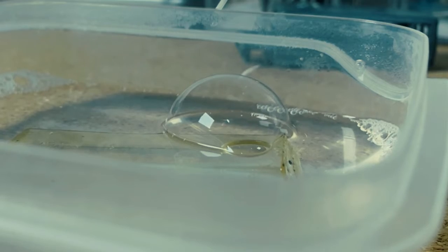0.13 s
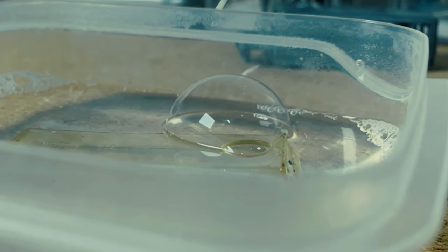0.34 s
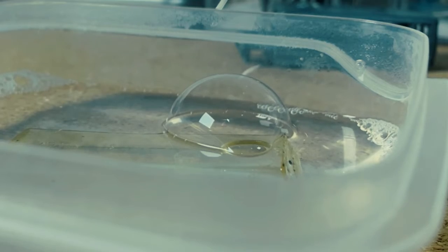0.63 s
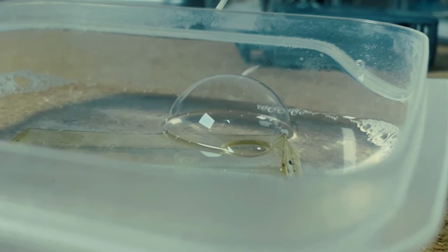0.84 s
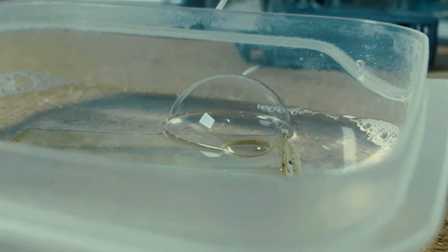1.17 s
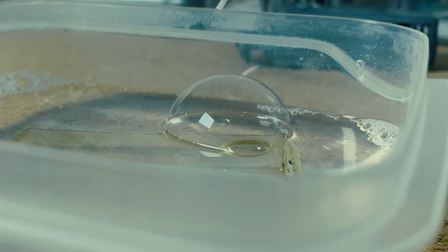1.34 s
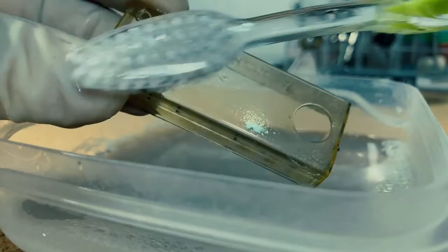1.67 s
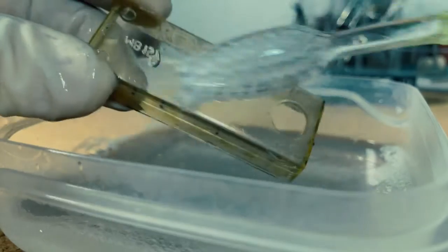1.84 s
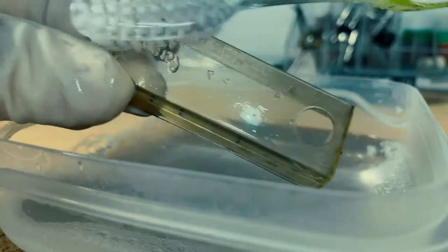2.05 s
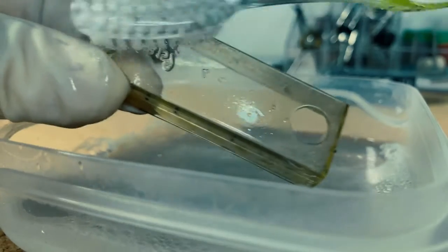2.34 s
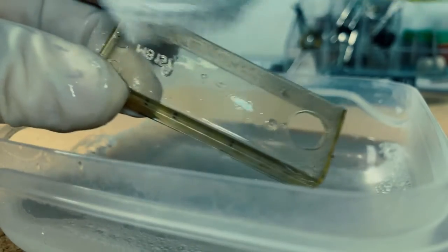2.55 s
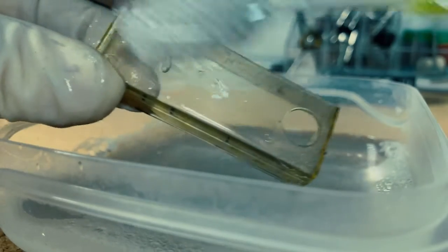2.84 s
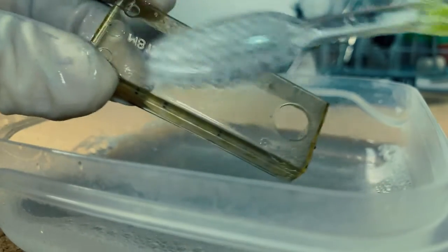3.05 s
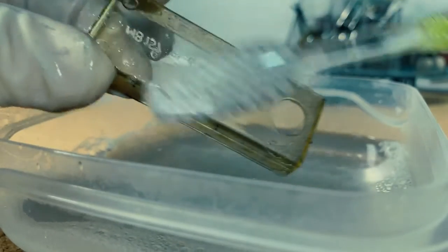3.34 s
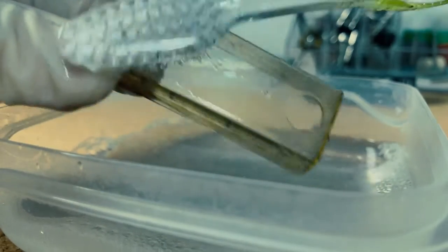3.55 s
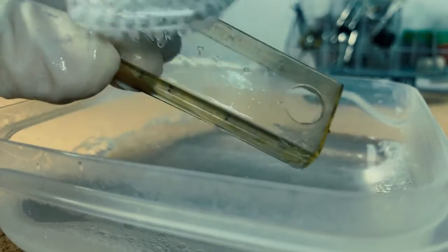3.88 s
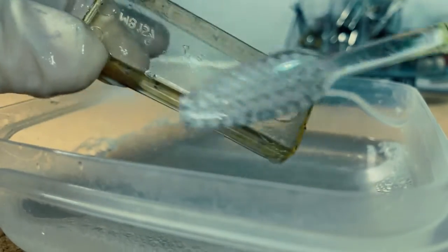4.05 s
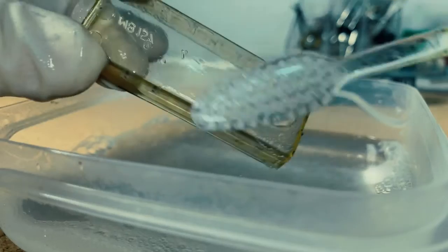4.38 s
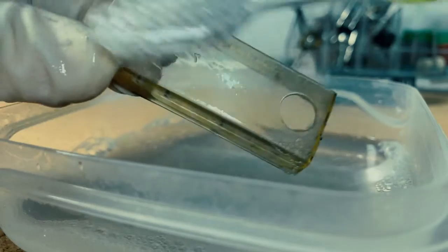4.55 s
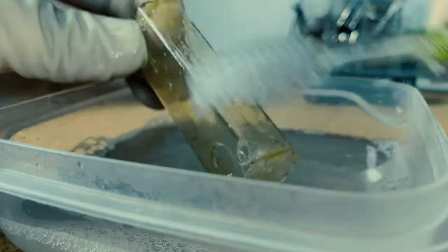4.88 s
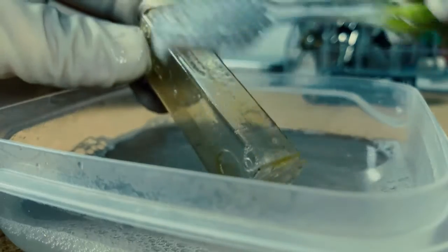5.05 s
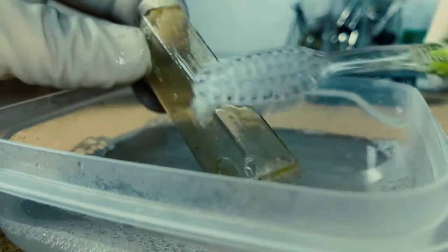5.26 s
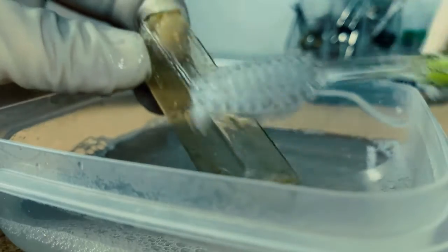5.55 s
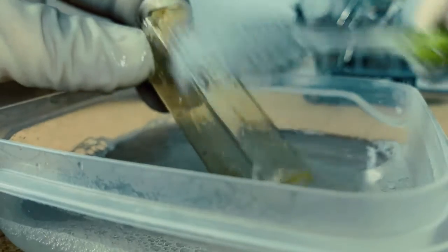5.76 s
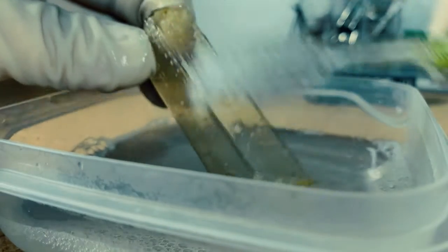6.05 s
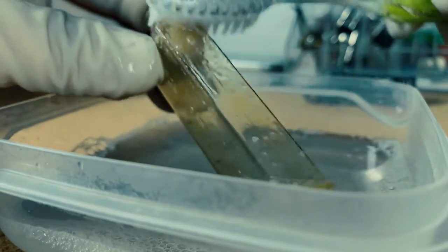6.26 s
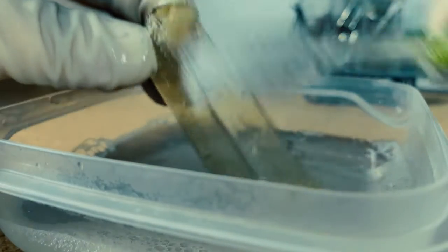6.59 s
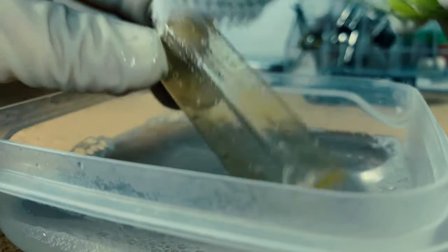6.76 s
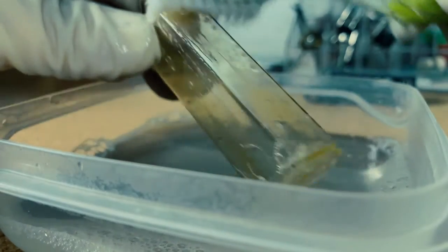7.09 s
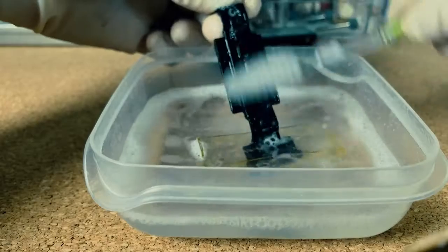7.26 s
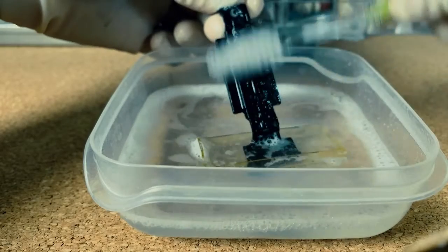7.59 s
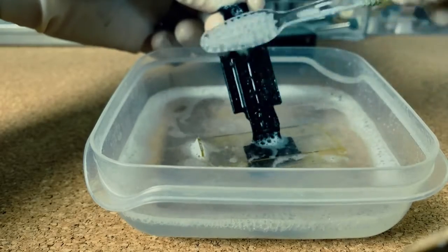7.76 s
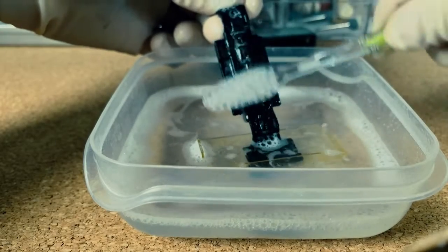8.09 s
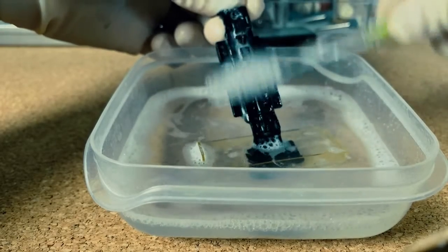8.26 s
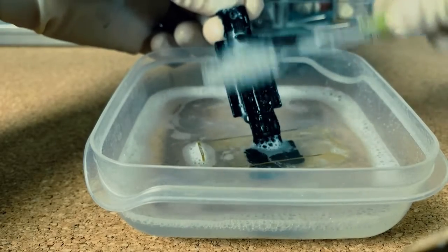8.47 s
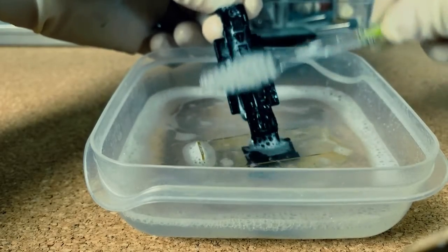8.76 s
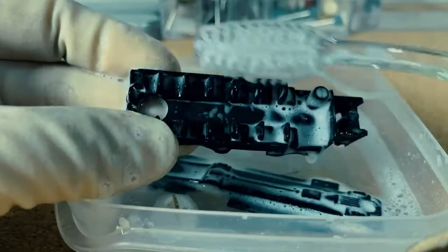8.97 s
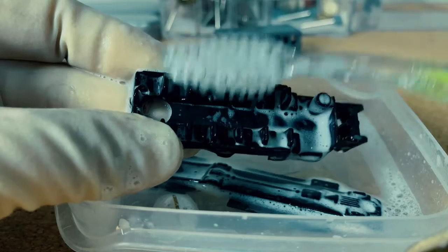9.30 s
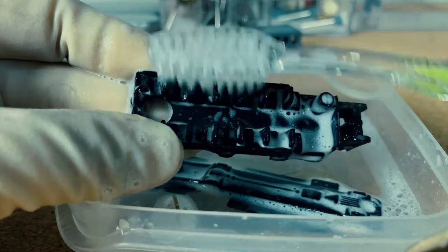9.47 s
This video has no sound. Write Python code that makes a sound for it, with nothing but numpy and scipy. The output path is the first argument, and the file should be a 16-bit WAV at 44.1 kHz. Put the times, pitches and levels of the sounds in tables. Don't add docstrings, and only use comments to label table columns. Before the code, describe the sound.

A quiet room with deep soft rumble gives way to dry, fizzy bristle scrubbing, very near the microphone. Alternating strokes swish over four small wet plastic parts in turn, each with a different colour and ring. Sharp bristle snaps, dull brush-head knocks against part and tub, and thuddy table rumble accompany them. The scrubbing quickens, stops for a moment, then resumes until the end.

```python
import sys
import numpy as np
from scipy import signal
from scipy.fft import rfft, irfft, next_fast_len
from scipy.io import wavfile
from scipy.ndimage import uniform_filter1d

SR = 44100
rng = np.random.default_rng(int(sys.argv[2]) if len(sys.argv) > 2 else 0)


def generate_wav(signal):
    frames = np.transpose(np.atleast_2d(signal))
    scaled = np.clip(frames, -1, 1) * 32767
    pcm = np.round(scaled).astype(np.int16)
    wavfile.write(sys.argv[1], SR, pcm)


def undo_db(level):
    steps = np.asarray(level, float) / 20
    return 10 ** steps


N = 424683
SIZE = next_fast_len(N + 4096)
HZ, T = np.fft.rfftfreq(SIZE, 1 / SR), np.arange(N) / SR


def evened(x):
    return x / np.sqrt(np.mean(x ** 2) + 1e-20)


def read(points, hz=HZ):
    f, value = np.transpose(points)
    return np.interp(np.log(hz + 1), np.log(f + 1), value)


def over_time(points):
    return undo_db(np.interp(T, *np.transpose(points)))


def colour(x, gain):
    return irfft(rfft(x, SIZE) * gain, SIZE)[..., :N]


def band(lo_hz, hi_hz, steep=6):
    low_side = 1 + (lo_hz / (HZ + 1)) ** (2 * steep)
    high_side = 1 + (HZ / hi_hz) ** (2 * steep)
    return 1 / np.sqrt(low_side * high_side)


def humps(modes):
    return sum(undo_db(db) / (1 + ((HZ - hz) / width) ** 2) ** 0.98 for hz, width, db in modes)


def pair(gain, same):
    a, b = rng.standard_normal((2, N))
    return evened(colour(np.array([a, same * a + np.sqrt(1 - same ** 2) * b]), gain))


def flutter(ms):
    width = int(ms * 44)
    return evened(uniform_filter1d(uniform_filter1d(rng.standard_normal(N), width), width))


def frames(x):
    return signal.stft(x, SR, nperseg=512, noverlap=384)


def patches(shape, bins, steps):
    return evened(uniform_filter1d(uniform_filter1d(rng.standard_normal(shape), bins, 0), steps, 1))


CUTS = [
    1.668,
    8.912,
    9.142,
]


def is_brushing():
    start, stop, resume = CUTS
    return (T > start) & (T < stop) | (T > resume)


# start in seconds, deep level in dB, low level in dB.
TABLE = [
    (0, -68, -64.5),
    (1.671, -54.5, -50.5),
    (4.85, -58.5, -53.5),
    (7.2, -61, -53.5),
    (8.92, -59.5, -55),
]
# time in seconds, change of level in dB (negative for a dip),
# length in seconds.
RUMBLE_SWELLS = [(.55, 3, 0.14), (.9, 8, 0.14), (2.35, 6, 0.49), (2.73, 3, 0.1), (3.3, 10, 0.46),
                 (3.9, 10.5, 0.079), (4.65, 4.5, 0.81), (4.86, -26, 0.031), (5.46, 4.5, 0.063),
                 (5.63, -11.5, 0.058), (6.3, 8, 0.88), (8.87, 20.5, 0.015), (9.6, 3, 0.43)]


def table_db():
    start, deep_db, low_db = np.transpose(TABLE)
    now = np.searchsorted(start, T, "right") - 1
    swell_db = sum(db * np.exp(-((T - s) / length) ** 2) for s, db, length in RUMBLE_SWELLS)
    return deep_db[now] + swell_db, low_db[now] + 0.38 * swell_db


# frequency in Hz, width in Hz, level in dB.
DEEP = [(34.2, 5.6, -15), (51.7, 7.4, 11), (78, 33, -1.5)]
LOW = [(120.3, 27, -1), (149.6, 6.6, 0), (198, 53, -6)]
STILL_ROOM = [(118.5, 5.6, 4), (141.6, 5.4, -2), (167, 11, -6.5), (217, 36, -19)]


def rumble():
    deep_db, low_db = table_db()
    lumps = flutter(45)
    deep = pair(humps(DEEP), 0.94) * undo_db(deep_db + 0.84 * lumps)
    low = np.where(T < CUTS[0], pair(humps(STILL_ROOM), 0.98), pair(humps(LOW), 0.94))
    low = low * undo_db(low_db + 2.56 * lumps)
    return (deep + low) * undo_db([[.7], [-.7]])


# frequency in Hz, level in dB.
HUSH = [(250, -9), (517, -29.5), (800, -28.5), (1380, -34.5), (4000, -41.5), (7500, -42.5), (7900, -54),
        (8900, -53), (9300, -42.5), (9800, -42), (12400, -37.5), (12800, -60), (13900, -63), (14200, -36),
        (15500, -35.5)]
# time in seconds, hiss level in dB.
HUSH_LEVEL = [(0, -76), (1.655, -76.5), (1.67, -56), (8.9, -63), (8.91, -70), (9.14, -70), (9.63, -66)]
# frequency in Hz, width in Hz, level in dB.
MURMUR = [(290, 100, 0.5)]
# time in seconds, traffic level in dB.
MURMUR_LEVEL = [(0, -65), (.3, -80), (.55, -75.5), (1.0, -89), (1.6, -82)]


def room():
    hush = pair(undo_db(read(HUSH)) * band(306, 15500), 0.31) * over_time(HUSH_LEVEL)
    murmur = pair(humps(MURMUR), 0.88) * over_time(MURMUR_LEVEL)
    return rumble() + hush + murmur


# time in seconds, pitch in Hz, level in dB.
RUB = [
    (2.2, 330, -79),
    (2.321, 400, -50),
    (2.5, 474.6, -52.5),
    (2.75, 406, -55.5),
    (2.85, 376, -61),
]


def rub():
    s, hz, db = np.transpose(RUB)
    turns = np.cumsum(np.interp(T, s, hz)) / SR
    tone = np.sin(2 * np.pi * turns) + .5 * np.sin(2 * np.pi * 1.6 * turns)
    return tone * flutter(12) * undo_db(np.interp(T, s, db, -120, -120))


# time in seconds, peak in dB, pitch in Hz, time to fall 60 dB in seconds.
KNOCKS = [(1.455, -74, 4200, .03), (1.53, -74, 4300, .04), (1.603, -71, 1900, .04), (1.632, -65, 4400, .02),
          (2.028, -36, 678, 0.078), (2.981, -32.5, 474, 0.098), (3.238, -35, 370, 0.082),
          (3.42, -38.5, 258, 0.31), (2.71, -32, 123, 0.16), (3.234, -39, 62, 0.16), (3.895, -35, 62, .15),
          (4.37, -38, 447, 0.19), (4.394, -33, 152, 0.13), (5.016, -39, 369, 0.16),
          (6.134, -26.5, 394, 0.11), (6.35, -30, 825, 0.045), (6.81, -31.5, 350, 0.13),
          (7.682, -35, 348, 0.06), (7.786, -39.5, 352, 0.24), (8.431, -41.5, 403, 0.13),
          (8.846, -28, 484, 0.053), (8.854, -24, 754, 0.023)]


def knocks():
    out, t = np.zeros(N + 8000), np.arange(8000) / SR
    overtones = [(1, 0.98), (1.2, 0.51), (1.5, 0.404), (1.85, 0.16), (2.2, 0.28)]
    for s, db, hz, t60 in KNOCKS:
        ring = sum(g * np.sin(2 * np.pi * hz * ratio * t) for ratio, g in overtones)
        onset = np.minimum(t / 0.00083, 1)
        out[round(s * SR):][:8000] += undo_db(db - 5.0 - 60 * t / t60) * onset * ring
    return out[:N] * undo_db([[1.2], [-1.2]])


# time in seconds, peak in dB, level of the part's ring in dB.
SNAPS = [(1.6685, -31, -62), (1.675, -30, -57), (1.7877, -12.5, -29), (1.9972, -25, -39),
         (2.625, -13.5, -60), (2.854, -17, -37.5), (3.2606, -22, -60), (3.6364, -25, -54),
         (3.949, -26.5, -39), (4.0925, -26, -60), (4.117, -11, -33), (4.1178, -15.5, -40.5),
         (4.628, -27.5, -38), (4.684, -22, -52), (5.4934, -10.5, -46), (5.752, -19, -55),
         (5.953, -13.5, -49), (5.9764, -14, -59), (6.0054, -21, -61), (6.295, -20.5, -65),
         (6.334, -16.5, -55.5), (6.865, -26.5, -73.5), (6.9964, -43, -54), (7.68, -20, -61),
         (8.002, -30, -42), (8.0554, -16, -59), (8.3247, -30, -49), (9.1177, -50, -79), (9.146, -34.5, -58),
         (9.2378, -19, -48), (9.3462, -22, -50), (9.3946, -22, -46), (3.006, -21, -50), (5.0183, -22, -56),
         (5.614, -20, -46), (5.771, -19, -52), (5.8996, -26, -49), (6.051, -17, -48), (6.194, -21, -50),
         (6.3203, -21.5, -58), (6.7204, -19, -44), (7.1425, -21, -42), (7.542, -22.5, -49),
         (8.535, -23.5, -54), (8.641, -28, -54)]


def snaps():
    bright, low, t = np.zeros(N), np.zeros(N), np.arange(300) / SR
    for s, db, low_db in SNAPS:
        at = round(s * SR)
        crack = np.append(2.5, rng.standard_normal(299))
        crack = crack / np.linalg.norm(crack * undo_db(-60 * t / .006)) * 5
        bright[at:at + 300] += undo_db(db - 1.5 - 60 * t / .006) * crack
        low[at:at + 300] += undo_db(low_db + 11 - 60 * t / .007) * crack
    return bright, low


# turn in seconds, then stall, bite, release and touch on the tub in dB.
ON_FLAT = [(1.664, -44, -32.5, -33.5, -41), (1.745, -47, -28.5, -35.5, -66),
           (1.908, -35, -31, -28.5, -39.5), (2.085, -41, -30.5, -32.5, -38), (2.222, -34, -34, -27.5, -35),
           (2.376, -41, -29, -33, -36), (2.512, -36, -34, -28.5, -35.5), (2.664, -43, -30, -31, -38.5),
           (2.821, -39, -24, -26, -45), (2.981, -40, -28, -29, -36.5), (3.123, -37.5, -26.5, -28, -53),
           (3.278, -42, -29, -31, -53), (3.434, -43, -34, -32, -39.5), (3.587, -48.5, -29.5, -35, -79),
           (3.746, -42, -30.5, -40, -31), (3.904, -40.5, -32.5, -31.5, -40.5),
           (4.078, -46.5, -32, -30.5, -46.5), (4.24, -45, -32.5, -35, -34),
           (4.453, -48.5, -31.5, -34, -48.5), (4.645, -46, -33.5, -31, -42.5)]
ON_UPRIGHT = [(4.853, -48, -28, -28.5, -40), (4.994, -44, -22.5, -22, -29.5), (5.165, -43.5, -23, -28, -42),
              (5.3, -48, -27, -22.5, -33.5), (5.454, -49.5, -21, -23.5, -38),
              (5.586, -45, -25.5, -23.5, -30), (5.74, -46.5, -21, -35, -41.5),
              (5.878, -49, -26, -22.5, -37.5), (6.017, -49, -23, -30, -39.5),
              (6.154, -47, -25.5, -22.5, -34.5), (6.3, -48, -26, -23.5, -34.5),
              (6.432, -44.5, -28, -27.5, -37), (6.569, -44, -28, -27, -37.5),
              (6.697, -44, -25.5, -31, -33.5), (6.844, -39, -27, -30, -36.5),
              (6.98, -41.5, -28.5, -21.5, -35), (7.118, -43, -20, -42, -42)]
ON_RIBBED = [(7.297, -52, -28, -26, -36.5), (7.42, -47, -28, -28.5, -37), (7.522, -45.5, -23, -27.5, -34.5),
             (7.648, -44.5, -26.5, -28, -33), (7.747, -45.5, -26, -23, -35.5),
             (7.858, -44, -32, -29, -33.5), (7.965, -46, -25.5, -29, -34), (8.082, -44, -27.5, -38, -34),
             (8.177, -42, -24, -25, -33), (8.286, -46.5, -27.5, -35, -33), (8.391, -48.5, -28, -27, -33.5),
             (8.507, -46, -25, -27.5, -35.5), (8.607, -46, -25, -27, -32), (8.718, -47, -34, -28.5, -34.5),
             (8.809, -47, -43, -29, -26)]
ON_STUDDED = [
    (8.904, -50, -96, -85.5, -49),
    (9.15, -47, -28, -48.5, -38),
    (9.308, -51.5, -31, -21.5, -36),
    (9.44, -44.5, -42, -48.5, -48),
    (9.55, -42.5, -34, -24, -43.5),
]
# rise in dB per second, fall in dB per second, ring of the part in dB.
HANDLING = [
    (321, 287, -15.5),
    (640, 464, -18.5),
    (495, 467, -21),
    (267, 602, -21),
]


def strokes():
    parts = [ON_FLAT, ON_UPRIGHT, ON_RIBBED, ON_STUDDED]
    last_turn_s, last_stall_db, quickest_s = 9.67, -50.5, .01
    turn, stall, bite, release, touch = np.concatenate(parts).T
    rise, fall, ring = np.repeat(HANDLING, [len(p) for p in parts], axis=0).T
    after = np.append(turn[1:], last_turn_s)
    next_stall = np.append(stall[1:], last_stall_db)
    bite_s = turn + np.maximum((bite - stall) / rise, quickest_s)
    release_s = after - np.maximum((release - next_stall) / fall, quickest_s)
    release_s = np.maximum(release_s, bite_s + quickest_s / 10)
    at = np.append(np.transpose([turn, bite_s, release_s]), after[-1])
    level_db = np.append(np.transpose([stall - 1.5, bite, release]), next_stall[-1])
    return at, level_db, (bite_s + release_s) / 2, ring, touch


def flicks(per_s, spread_db, clump_db):
    size = undo_db(spread_db * np.minimum(rng.exponential(1, N), 6)) * rng.standard_normal(N)
    clumps = undo_db(clump_db * flutter(19.0) + 0.77 * flutter(0.59))
    return evened(size * (rng.random(N) < per_s / SR) * clumps)


SWELL_DB = [5, 0, 1, 2.5, 0.5, 1, 1, 1.5, -3, 1, 0, 3, 2.5, 1, 5, 4, 0.5, 2.5, 2.5, 0.5, -0.5, -4, 0.5, 0,
            -1.5, 1.5, 4.5, 3, 4.5, 1, 5, 6.5, 6, 7, 7.5, 3.5, 3.5, -2, -2, 0.5, 0, -1, 1.5, 1, 4, -1, 4,
            2.5, -3, 1.5, 3, 2, 4, 1, 4.5, 3.5, -6]
RING_DB = [1.5, 0.7, -0.7, 0, -2, -0.5, 0, -3, -2.5, 0.1, -2.2, 0.58, 1.4, 0.5, 0.3, 0.73, 1.7, 2.4, 1.5, 2,
           1, 2, 0.5, 2.2, 0, 5, 1.2, -2.5, 2, -2.5, 1.3, -3, 0.8, 0.3, 2.3, -0.6, -1, -1, -3, -3, -1.3,
           -0.8, -1, -1, -2, -2, 0, 0, -2.2, -0.7, 0, -1, 9, -2, -0.42, -2, -1]


def spray():
    at, level_db, mid, ring, scrape = strokes()
    place = np.interp(T, at, np.arange(len(at)))
    step, part = np.floor(place), place % 1
    drifting = step % 3 == 1
    sharp = np.where(drifting, 1, 1.9)
    place = step + part ** sharp / (part ** sharp + (1.24 * (1 - part)) ** sharp)
    stroke_db = np.interp(place, np.arange(len(at)), level_db)
    stroke_db += np.where(drifting, np.interp(T, mid, SWELL_DB) * np.sin(np.pi * part), 0)
    ring_db = np.interp(T, mid, RING_DB) + 0.82 * stroke_db + np.interp(T, mid, ring) - 1
    scrape_db = 0.66 * stroke_db + np.interp(T, mid, scrape) + 0.69 + 2.0 * flutter(24)
    fizz_db = stroke_db - 1.5
    bright, low = snaps()
    common, on, out = flicks(9000, 1.0, 0.25), is_brushing(), 0
    groups = [(200, 1450, scrape_db, 0), (1450, 5550, ring_db, low),
              (5550, 10500, fizz_db, bright), (10500, 16500, fizz_db, bright)]
    for lo, hi, db, cracks in groups:
        group = 0.95 * common + 0.74 * flicks(9000, 1.2, 1.0)
        hz, t, z = frames(group * undo_db(db) * on + cracks)
        out = out + z * ((hz >= lo) & (hz < hi))[:, None]
    return hz, t, out


# frequency in Hz, level in dB.
SCATTER = [(300, -1), (700, -6), (1250, -5.5), (2000, -10), (2500, -14), (3200, -19.5), (4300, -22),
           (5100, -15), (6000, -18), (7400, -21), (8500, -23), (9500, -17), (11000, -22), (12300, -21),
           (13400, -20), (16000, -24)]


def scatter(z, hz):
    linger = np.sqrt(abs(uniform_filter1d(abs(z) ** 2, 25, 1, origin=6)))
    on = is_brushing()
    stft_on = np.append(on[::128], np.repeat(on[-1], z.shape[1]))[:z.shape[1]]
    linger = linger * stft_on
    stall = linger.sum(0) / (abs(uniform_filter1d(abs(z).sum(0), 5)) + 1e-9)
    linger *= np.clip(stall, .5, 2.5) ** .2
    linger *= undo_db(read(SCATTER, hz)[:, None] + 4.5 * patches(z.shape, 7, 22))
    return linger * np.exp(2j * np.pi * rng.random((2, *z.shape)))


def part_gain(hz, tint, tilt, left):
    shape = np.where(hz < 1450, undo_db(tilt * np.log2(hz / 600 + .1)), undo_db(read(tint, hz)))
    for lo, hi in [(300, 1450), (1450, 5550), (5550, 16500)]:
        inside = (hz >= lo) & (hz < hi)
        power = np.sum((shape ** 2 * (1 + left ** 2) / 2)[inside]) / len(hz)
        shape[inside | (hz < lo) & (lo < 1000)] /= np.sqrt(power)
    return shape


def stirred(turns, hz):
    stir = np.interp(hz, [300, 700, 2000, 3300, 4300, 5000, 6000, 6600],
                     [.05, .14, .13, .12, .14, .13, .12, .075])
    turns = turns + patches(turns.shape, 4, 24) * stir[:, None]
    for pull in (.95, .7):
        turns = turns - pull * np.sin(2 * np.pi * turns) / (2 * np.pi)
    return turns


PART_STARTS = [
    1.654,
    4.86,
    7.25,
    8.93,
    9.7,
]
# frequency in Hz, level in dB.
FLAT_CASE = [(1464, -21), (1637, -13.7), (1981, -12.5), (2239, -6), (2412, -10), (2670, -20.5),
             (3187, -11.5), (4393, -10), (4651, -11.5), (5943, -11.5), (7235, -4), (8355, -9), (9044, 3),
             (9561, -4.5), (10164, -1.5), (11714, -6.5), (12145, -3), (12748, -9.0), (13954, -1.6),
             (15590, -7)]
UPRIGHT_CASE = [(1464, -15.5), (1981, -18.5), (2412, -11), (2670, -22.5), (3445, -11), (4048, -15),
                (4307, -15.5), (4565, -12), (4996, -12), (5771, -16.5), (6546, -7.5), (7494, -8.5),
                (7838, -5.5), (8355, -1), (8872, -2.3), (12145, -1.5), (12575, -8), (13264, -1.5),
                (15073, -3.2), (15590, -2)]
RIBBED_BAR = [(1464, -22.5), (1637, -19), (2326, -14.5), (2670, -26), (4134, -13), (4479, -16.5),
              (5082, -18.0), (5426, -13), (6029, -18), (6718, -8), (8441, 1.5), (9475, -14), (9819, -4),
              (10422, -6), (11886, -1.2), (13264, -3), (13781, 0), (14212, -7), (14901, -2.5), (15590, 0.5)]
STUDDED_BAR = [(1464, -30), (2239, -20.5), (3015, -28.5), (3273, -20), (3531, -22.1), (3790, -13),
               (4651, -13.5), (4910, -8), (5426, -14), (6029, -6.5), (6718, -12), (7321, -3), (8096, 2.5),
               (9475, -8), (9819, -3), (9991, -6.9), (10508, -4.5), (12145, -1.1), (13609, -2.5),
               (15590, -4)]
# frequency in Hz, phase in half turns.
LEADS = [
    [(500, -.36), (900, -.46), (1380, -1), (1600, -1.4), (2070, -1.48), (2380, -1.58), (2580, -2.45),
     (2750, -2.63), (3080, -2.55), (3230, -3), (3380, -3.5), (3600, -3.47), (4200, -3.67), (4650, -3.54),
     (4950, -3.31), (5300, -3.33), (5700, -3.57)],
    [(500, -.36), (800, -.45), (1100, -.45), (1380, -1), (1600, -1.42), (2070, -1.58), (2400, -1.66),
     (2700, -2.36), (2900, -2.47), (3260, -3), (3420, -3.53), (3650, -3.5), (3900, -3.68), (4150, -3.6),
     (4400, -3.48), (4650, -3.46), (4950, -3.26), (5300, -3.32), (5700, -3.5)],
    [(500, -.4), (1250, -.36), (1550, -.63), (1900, -.54), (2200, -.63), (2480, -1), (2660, -1.45),
     (2850, -1.58), (3150, -1.4), (3400, -1.5), (4000, -1.66), (4650, -1.5), (5000, -1.35), (5300, -1.47),
     (5900, -1.5)],
    [(500, -.4), (1250, -.4), (1500, -1), (1800, -1.38), (2300, -1.47), (2600, -1.64), (3100, -1.39),
     (3600, -1.78), (4150, -1.75), (4400, -1.5), (4850, -1.29), (5200, -1.45), (5700, -1.45)],
]
# frequency in Hz, phase in half turns.
PATH = [(6200, .34), (6650, .34), (7050, .47), (7800, .59), (8100, .7), (8520, 1), (8980, 1.33),
        (9500, 1.46), (10300, 1.64), (10600, 1.84), (11400, 2.17), (11900, 2.45), (12650, 2.63),
        (12900, 2.8), (13780, 3.2), (14030, 3.36), (15000, 3.6), (15300, 3.76), (15700, 3.95)]
# frequency in Hz, width in Hz, level in dB.
LEFT_PEAKS = [
    (3593, 410, 10.5),
    (3530, 560, 7.5),
    (4040, 240, 4.5),
    (900, 2400, 4.5),
]
SCRAPE_TILTS = [
    -3.5,
    1.5,
    2,
    -6.5,
]


def brushing():
    hz, t, z = spray()
    z = z * undo_db(2.43 * patches(z.shape, 2, 20))
    sway = 1 + .007 * flutter(40)[::128][np.minimum(np.arange(len(t)), N // 128 - 1)]
    gain, cavity, turns = np.zeros((3, *z.shape))
    tints = [FLAT_CASE, UPRIGHT_CASE, RIBBED_BAR, STUDDED_BAR]
    parts = zip(PART_STARTS, PART_STARTS[1:], tints, LEADS, LEFT_PEAKS, SCRAPE_TILTS)
    for start, end, tint, lead, (peak_hz, width, db), tilt in parts:
        now = (t >= start) & (t < end)
        left = undo_db(db * np.exp(-((hz - peak_hz) / width) ** 2))
        gain[:, now] = part_gain(hz, tint, tilt, left)[:, None]
        cavity[:, now] = left[:, None]
        whole_turns = 2 * np.floor(lead[-1][1] / 2)
        path = [(path_hz, whole_turns + more) for path_hz, more in PATH]
        f, half_turns = np.transpose(list(lead) + path)
        turns[:, now] = np.interp(hz[:, None] * sway[now], f, half_turns)
    turns = stirred(turns, hz)
    loose = np.exp(1j * 1.05 * patches(z.shape, 3, 5))
    total = np.cos(np.pi * turns / 2)
    difference = -1j * np.sin(np.pi * turns / 2) * loose
    left, right = scatter(z, hz)
    left_port = cavity * (z * (total + difference) + left)
    right_port = z * (total - difference) + right
    ports = gain * np.array([left_port, right_port])
    return signal.istft(ports, SR, nperseg=512, noverlap=384)[1][:, :N]


def scene():
    return room() + rub() + knocks() + brushing()


def low_pass(x):
    return signal.sosfilt(signal.butter(12, 17080, fs=SR, output="sos"), x)


def record(dry):
    mix = colour(dry, np.clip((15870 - HZ) / 250, 0, 1) ** 2)
    return low_pass(mix)


dry = scene()
out = record(dry)
generate_wav(out)
```